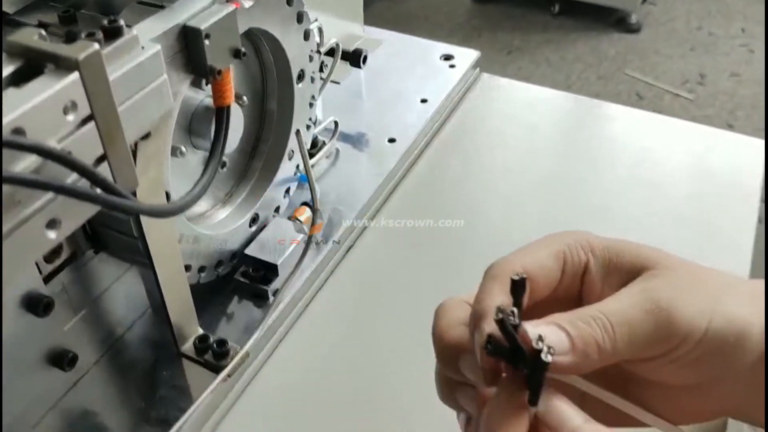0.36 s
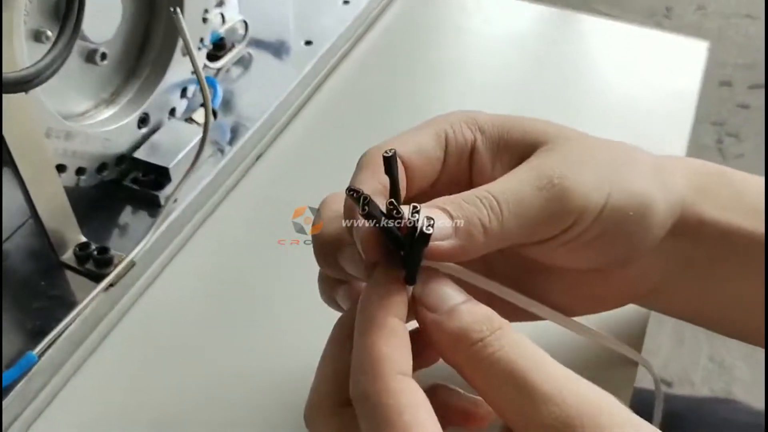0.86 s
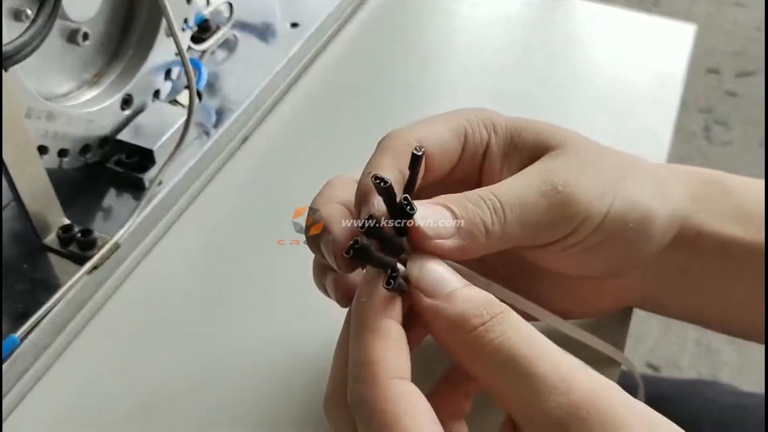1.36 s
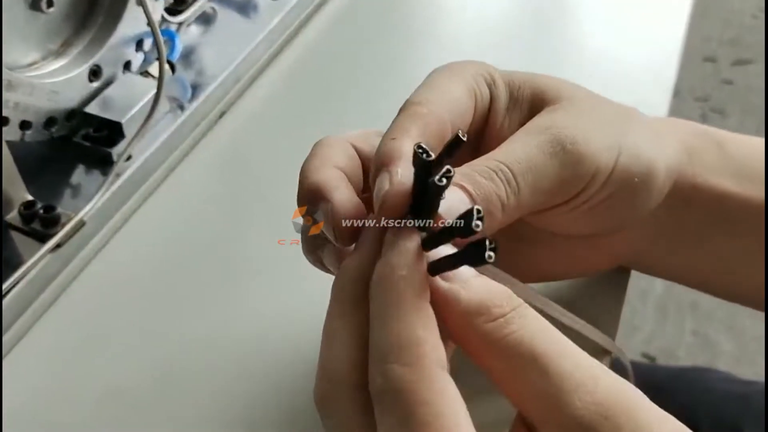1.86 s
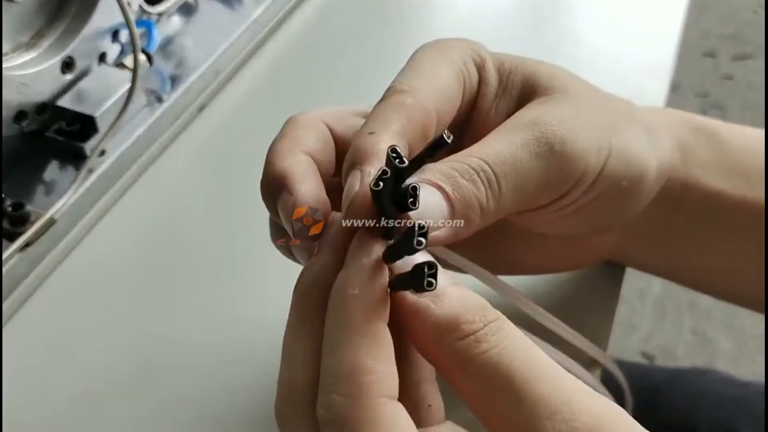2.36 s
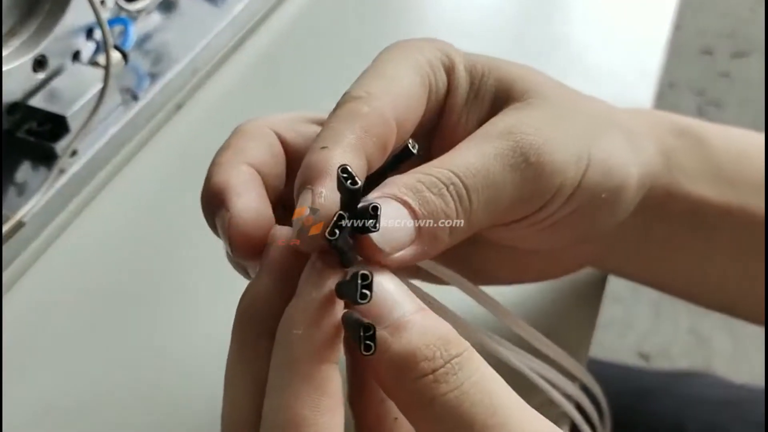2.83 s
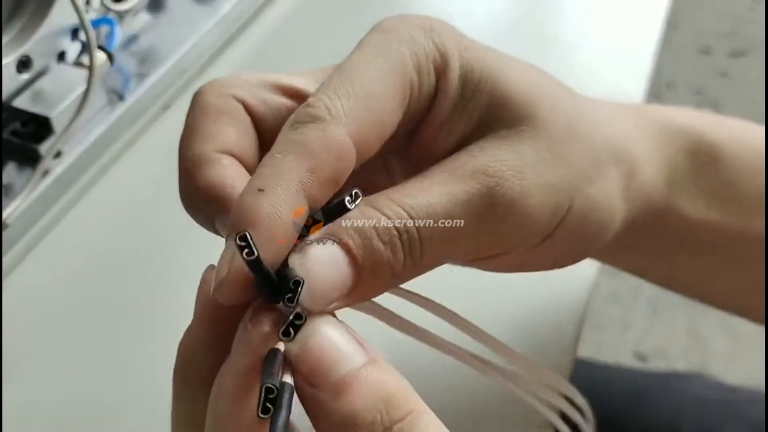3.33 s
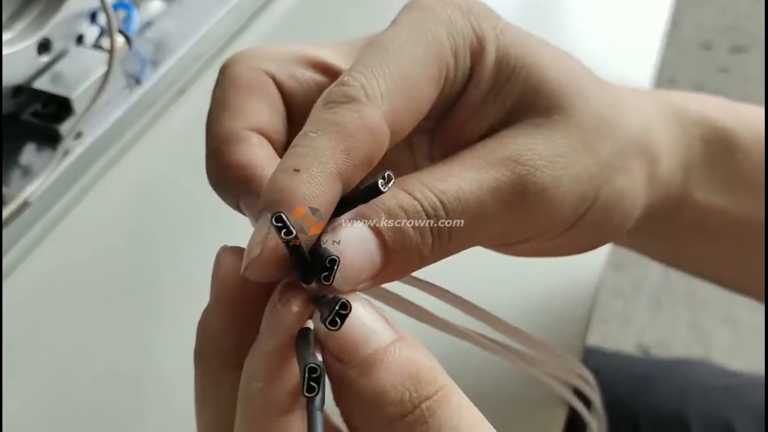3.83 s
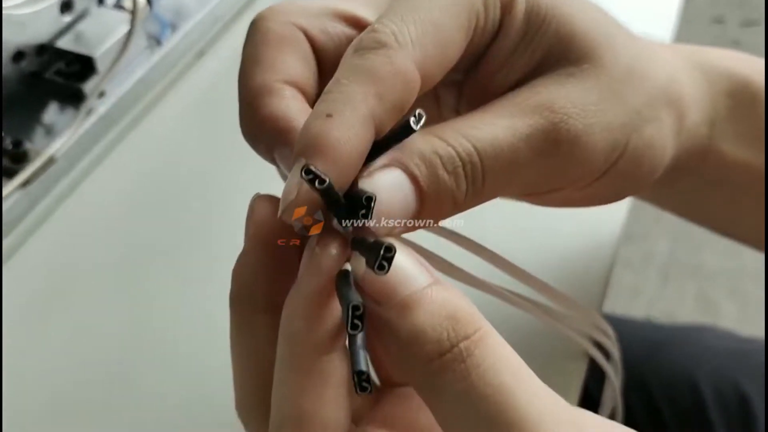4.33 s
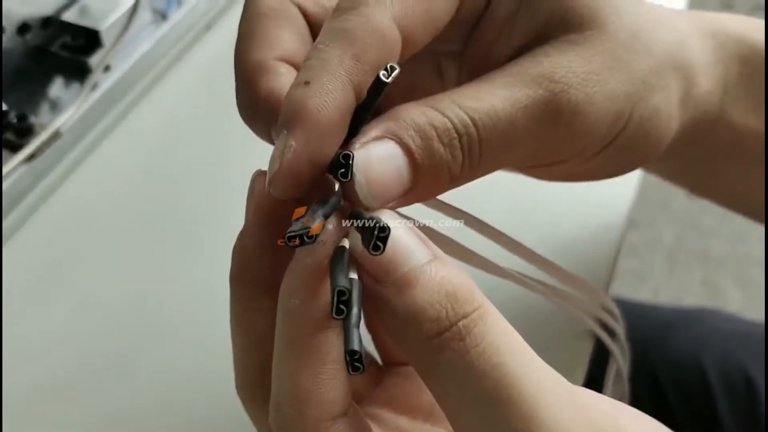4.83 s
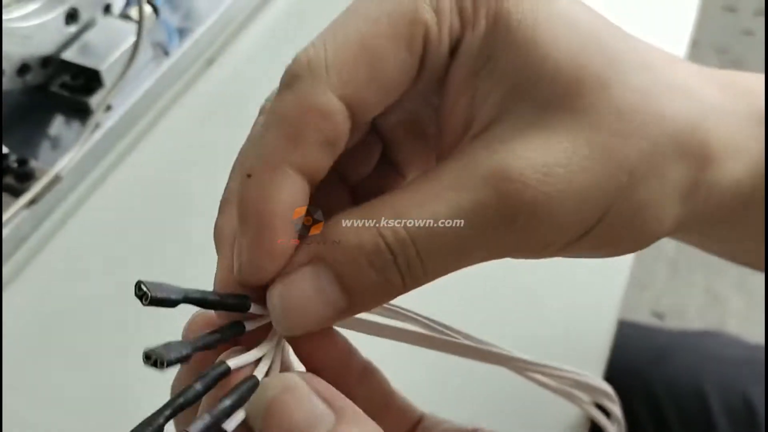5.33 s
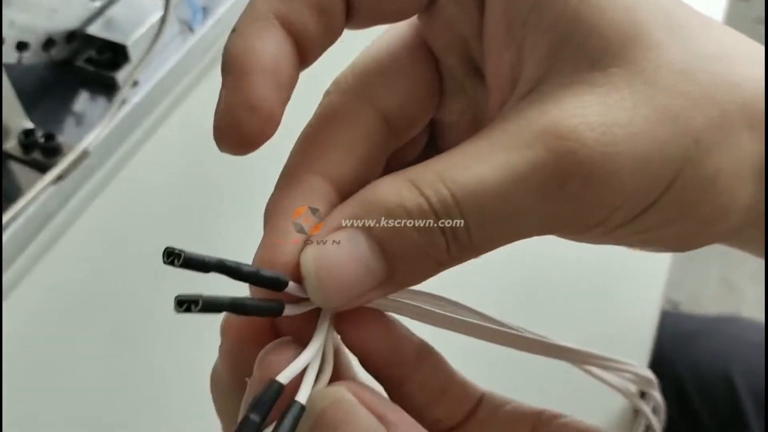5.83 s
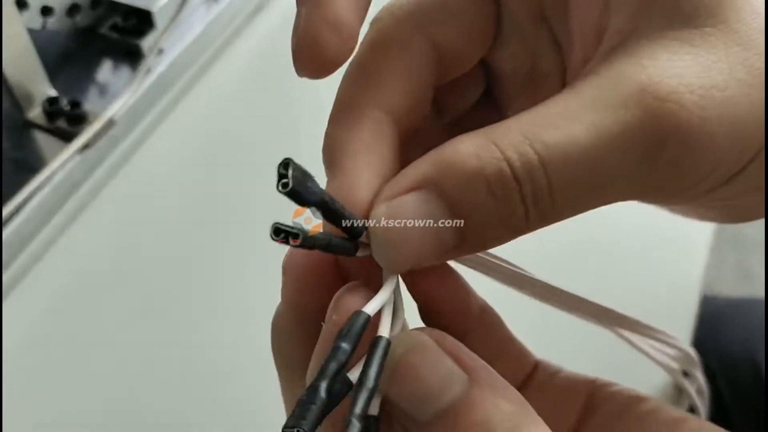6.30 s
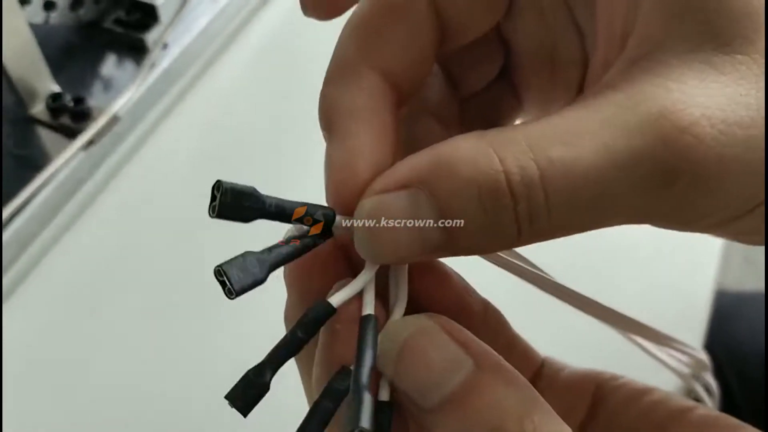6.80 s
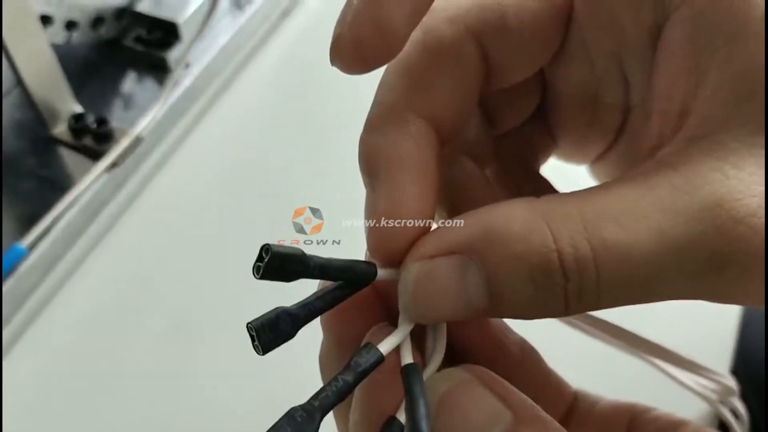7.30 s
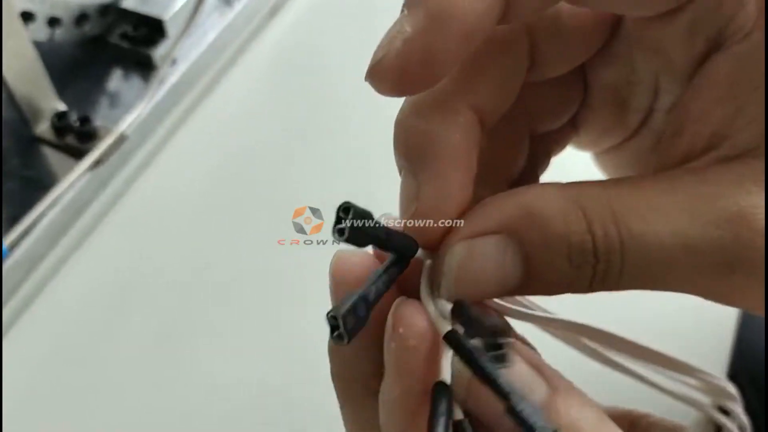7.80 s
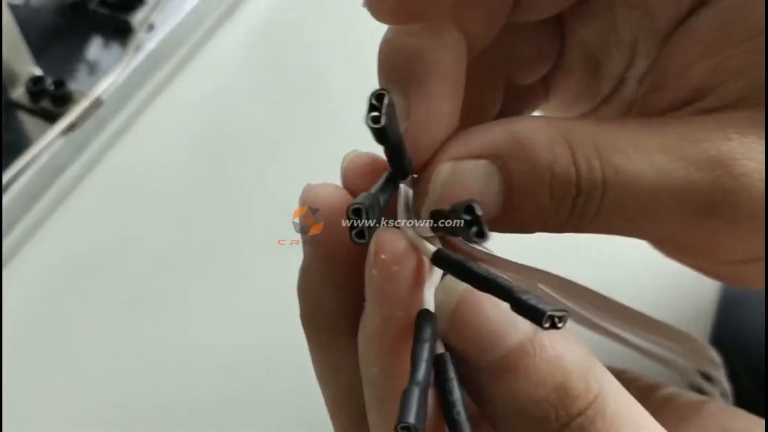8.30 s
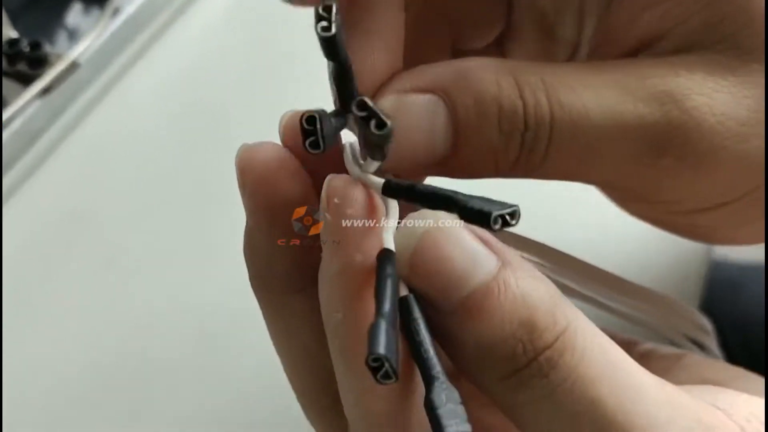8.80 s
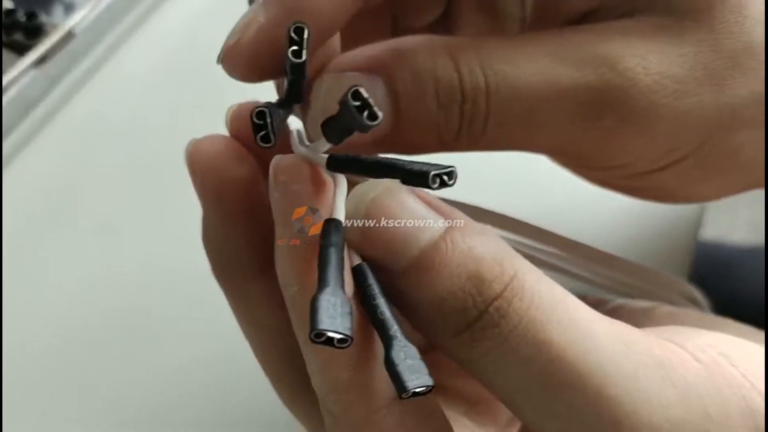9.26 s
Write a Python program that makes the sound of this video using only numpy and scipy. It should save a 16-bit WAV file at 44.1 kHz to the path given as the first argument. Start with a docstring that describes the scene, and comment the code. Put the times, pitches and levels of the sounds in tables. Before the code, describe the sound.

In a workshop, compressed air escapes from machine fittings as a strong, continuous high hiss. Below it lie a dull broadband rumble and a faint, wavering motor hum. A hand-held camera with two microphones turns from the machine to a bench, so the hiss changes colour slightly at first, then stays even. Small muffled air thumps touch one side at a time. Hands handling sleeved wire terminals make no distinct sound.

```python
"""A humming workshop: compressed air leaks from the fittings of a pneumatic machine with a steady high hiss.
Hiss and low rumble are shaped noise, partly alike at the two microphone ports of a hand-held camera near
the bench. The camera turns from machine to bench and sways, so the bench's reflections drift slowly across
the spectrum. Small puffs of air thump one port at a time; the machine hum is a set of wavering sines."""
import sys
import numpy as np
from scipy import signal
from scipy.fft import rfft, irfft, next_fast_len
from scipy.io import wavfile
from scipy.ndimage import uniform_filter1d, map_coordinates

SR = 44100
rng = np.random.default_rng(int(sys.argv[2]) if len(sys.argv) > 2 else 0)


def generate_wav(sig):
    """Save sig (samples, or channels by samples) to the path in sys.argv[1] as 16-bit PCM at SR."""
    pcm = np.round(np.clip(np.atleast_2d(sig).T, -1, 1) * 32767).astype(np.int16)
    wavfile.write(sys.argv[1], SR, pcm)


def how_loud(loudness_db):
    """Turn decibels into a plain amplitude multiplier (0 dB gives 1, 20 dB gives 10)."""
    steps = np.asarray(loudness_db, float) / 20
    return 10 ** steps


N = 425565  # length [samples]
FRAME = 2048  # short-time spectrum [samples]


def unit(x):
    """Scaled to rms 1."""
    return x / np.sqrt(np.mean(x ** 2) + 1e-20)


def along(points, hz):
    """Reads (frequency [Hz], value) points on a log frequency axis."""
    f, v = np.transpose(points)
    return np.interp(np.log(hz + 1), np.log(f + 1), v)


def closed(points, hz, low_db, high_db):
    """Gain of a spectrum that falls by low_db and high_db an octave beyond its ends."""
    octaves_below = np.log2(points[0][0] / (hz + 1)).clip(0)
    octaves_above = np.log2((hz + 1) / points[-1][0]).clip(0)
    return how_loud(along(points, hz) - low_db * octaves_below - high_db * octaves_above)


def bumps(rows, hz):
    """Bell-shaped lifts and hollows in dB, one row of the result for each port."""
    out = np.zeros((2, *hz.shape))
    for port, centre_hz, width_hz, db in rows:
        out[int(port > .5)] += db * np.exp(-.5 * ((hz - centre_hz) / width_hz) ** 2)
    return out


def patches(shape, bins, frames):
    """A random field of rms 1, smoothed over so many frequency bins and frames."""
    field = rng.standard_normal(shape)
    for _ in range(2):
        field = uniform_filter1d(field, max(1, round(bins)), axis=1)
        field = uniform_filter1d(field, max(1, round(frames)), axis=2)
    return unit(field)


def wobble(rate):
    """A smooth random curve with rate knots a second, 12 at most."""
    knots = rng.standard_normal(int(N * 12 / SR) + 4)
    return map_coordinates(knots, [np.arange(N) * min(rate, 12) / SR])


def air():
    """Jet hiss and workshop rumble reach both ports partly alike, coloured by the camera's pose."""
    noise = rng.standard_normal((2, N)) * np.sqrt(SR / 2)  # power 1 per Hz
    hz, t, z = signal.stft(noise, SR, nperseg=FRAME, noverlap=FRAME * 3 // 4)
    facing, paths, level_sway_db = camera_pose(t)
    # shorter path differences stretch the whole interference pattern up in frequency
    stretched = np.outer(hz, paths)
    pair = port_pair(z, hz, stretched)
    colour_db = pose_colour_db(hz, stretched, facing) + level_sway_db[:, None]
    eddies_db = 0.61 * patches(z.shape, bins=26, frames=8)
    power_sum = np.hypot(workshop_rumble(hz), air_jet(hz))[:, :, None]
    sound = pair * power_sum * near_reflections(hz, z.shape) * how_loud(colour_db + eddies_db)
    return signal.istft(sound, SR, nperseg=FRAME, noverlap=FRAME * 3 // 4)[1][:, :N]


def air_jet(hz):
    """The leak's turbulent hiss at each port, lifted and cut by cavity resonances in front of the ports."""
    # hiss density at each port before the pose colours it: (frequency [Hz], level [dB per Hz])
    jet_left = [(1900, -80), (2300, -70.5), (2900, -68.5), (3650, -72), (4500, -69), (5900, -67.5),
                (6450, -66.5), (7000, -72), (8150, -62.5), (9300, -70), (10600, -77), (11050, -79),
                (12100, -86), (13000, -100), (13900, -103), (15300, -103)]
    jet_right = [(2200, -72), (2900, -68.5), (3800, -69.5), (4250, -67.5), (5000, -66), (5700, -63.5),
                 (6050, -63.5), (7850, -65), (8500, -59.5), (9300, -62.5), (10200, -74), (10700, -72.5),
                 (11050, -78.5), (11500, -82), (12000, -76.5), (13600, -70), (15300, -69.5)]
    # cavity resonances: (port [0 left, 1 right], centre [Hz], width [Hz], lift [dB])
    cavity = [(0, 6500, 90, -1), (0, 6600, 120, 7.5), (0, 7650, 150, 7.5), (1, 1550, 80, -6),
              (1, 6450, 400, 3.5), (1, 7085, 220, 8.5), (1, 7527, 150, 7.5), (1, 7800, 90, -5)]
    jet = np.array([closed(points, hz, low_db=27, high_db=0) for points in (jet_left, jet_right)])
    return jet * how_loud(bumps(cavity, hz))


def camera_pose(t):
    """Turning to the machine shortens path differences; the unsteady hand sways path lengths and levels."""
    # the camera turns from the machine to the bench: (time [s], facing the machine [0-1])
    facing_points = [(0, 1), (.45, 0.74), (.75, 0.38), (2, 0.13), (4, 0.02), (9.65, 0.07)]
    shortening, path_law = 0.11, 0.78  # share of the path differences lost when facing, power of the facing
    sways_per_s, path_sway, sway_db = 0.94, 0.01, 0.19  # knots a second, share of path length, dB at each port
    at = np.minimum(t * SR, N - 1).astype(int)
    sway_path, *sway_level = [wobble(sways_per_s)[at] for _ in range(3)]
    facing = np.clip(np.interp(t, *np.transpose(facing_points)), 0, 1)
    paths = 1 - shortening * facing ** path_law + path_sway * sway_path
    return facing, paths, sway_db * np.array(sway_level)


def port_pair(z, hz, stretched):
    """Two noises mix into a partly alike pair; delay and reflections turn the left port's phase."""
    # how much of the sound both ports share: (frequency [Hz], likeness [0-1])
    likeness = [(60, 0.5), (150, 0.69), (400, 0.85), (600, 0.16), (870, 0.8), (1250, 0.54), (1450, 0.71),
                (1750, 0.31), (2200, 0.13), (2830, 0.95), (3300, 0.47), (4200, 0.38), (6300, 0.38),
                (9000, 0.3), (12500, 0.2)]
    # phase that reflections add at the left port: (frequency [Hz], phase [rad])
    reflected = [(0, .5), (700, 0.2), (870, 1.3), (1750, 1.6), (1900, -0.5), (2600, .5), (2960, -4.5),
                 (3400, -3), (3700, -5), (4100, -9), (5200, -6.5)]
    left_late_s = 0.000404  # at full path length
    drift_rad_per_khz = 0.19  # rms; short waves feel every small move
    drift = drift_rad_per_khz * hz[:, None] / 1000 * patches(z[:1].shape, bins=16.4, frames=124)[0]
    phase = np.interp(stretched, *np.transpose(reflected)) - 2 * np.pi * left_late_s * stretched + drift
    alike = np.clip(along(likeness, stretched), 0, 1)
    left = alike * np.exp(1j * phase) * z[1] + np.sqrt(1 - alike ** 2) * z[0]
    return np.array([left, z[1]])


def pose_colour_db(hz, stretched, facing):
    """Colour that holds while the camera faces the machine, and bench reflections that follow the paths."""
    # colour when fully facing the machine: (port [0 left, 1 right], centre [Hz], width [Hz], lift [dB])
    facing_colour = [(0, 1490, 300, -7.5), (0, 5500, 250, 4), (0, 6800, 500, -6), (0, 8440, 400, -2),
                     (0, 9400, 200, 0), (0, 11000, 700, 3), (1, 1400, 250, -2.5), (1, 4870, 800, -3),
                     (1, 7620, 200, 5), (1, 8300, 200, -0.5), (1, 9030, 150, 6.5), (1, 13300, 600, -6)]
    # where the bench's reflection meets the direct hiss, mostly cancelling it:
    # (port [0 left, 1 right], centre at full path length [Hz], width [Hz], lift [dB])
    hollows = [(0, 1720, 50, -4.5), (0, 3630, 70, -5), (1, 1390, 50, -1), (1, 2800, 50, 2),
               (1, 3650, 70, -4.5)]
    return bumps(facing_colour, hz)[:, :, None] * facing + bumps(hollows, stretched)


def near_reflections(hz, shape):
    """Reflections add to the direct sound at random phase: narrow ridges and hollows that drift."""
    share = 0.34 * np.clip(hz / 5000, .45, 1)[:, None]
    in_phase = patches(shape, bins=4, frames=74)
    quadrature = patches(shape, bins=4, frames=53)
    echoes = share * (in_phase + 1j * quadrature)
    return (1 + echoes) / np.sqrt(1 + 2 * share ** 2)  # mean power kept


def puffs():
    """Each eddy pushes one membrane: a short thump, a short low flutter, then a weaker eddy in its wake."""
    # puffs of air on one port: (time [s], port [0 left, 1 right], level before bass roll-off [dB], centre [Hz])
    puff_table = [(0.516, 0, -31.5, 210), (1.42, 1, -30.5, 170), (4.877, 1, -29.5, 170),
                  (5.014, 1, -37, 170), (5.642, 1, -32, 140), (5.68, 1, -34, 170), (5.731, 1, -27.5, 199),
                  (6.0, 1, -37, 150), (6.084, 1, -37, 170), (8.703, 0, -37, 160), (8.949, 1, -29.5, 160),
                  (8.98, 1, -30, 200), (9.021, 1, -34, 160), (9.08, 1, -35, 200)]
    flutter_db, flutter_s, flutter_late_s = -15, 0.034, 0.012  # level against the thump, bell width, delay
    wake_s, wake_db = 0.16, -14  # mean delay before a 1 s cap, level against the puff
    out, t = np.zeros((2, N + 2 * SR)), np.arange(-SR // 4, SR // 4) / SR
    low = signal.butter(2, [90, 280], "bandpass", fs=SR, output="sos")
    wakes = [(s + min(rng.exponential(wake_s), 1), port, db + wake_db, hz) for s, port, db, hz in puff_table]
    for s, port, db, hz in puff_table + wakes:
        thump = np.exp(-.5 * (t * hz * 2.3) ** 2) * np.sin(2 * np.pi * (hz * t + rng.random()))
        swell = np.exp(-.5 * ((t - flutter_late_s) / flutter_s) ** 2)
        flutter = swell * unit(signal.sosfilt(low, rng.standard_normal(len(t))))
        out[int(port > .5), round(s * SR):][:len(t)] += how_loud(db) * (thump + how_loud(flutter_db) * flutter)
    low_cut = signal.butter(2, 60, "highpass", fs=SR, output="sos")  # the microphones' own bass roll-off
    return signal.sosfiltfilt(low_cut, out)[:, SR // 4:][:, :N]


def hum():
    """Steady machine tones whose level wavers with the standing waves of the room."""
    # motor and transformer hum: (frequency [Hz], left level [dB], right level [dB], waver [dB])
    hum_tones = [(132.6, -70, -66.5, 2), (173, -76, -70, 2.5), (400, -63, -64.5, -3.5),
                 (512.6, -65, -62, 3), (595, -82, -64.5, 0), (613, -66.5, -67, 1.5), (704, -77, -65.5, 2),
                 (808, -71, -67, 1)]
    out, t = np.zeros((2, N)), np.arange(N) / SR
    for hz, left_db, right_db, waver_db in hum_tones:
        cycles = hz * t + 0.11 * wobble(4) + rng.random()
        tone = np.sqrt(2) * np.sin(2 * np.pi * cycles)
        out += how_loud([[left_db], [right_db]]) * how_loud(waver_db * wobble(0.81)) * tone
    return out


def workshop_rumble(hz):
    """Low broadband rumble of the workshop as it stands at each port."""
    # rumble density at each port before the pose colours it: (frequency [Hz], level [dB per Hz])
    shop_left = [(40, -100), (70, -95), (130, -80), (250, -79.5), (340, -78), (420, -76.5), (560, -78),
                 (700, -82), (860, -75.5), (1100, -75), (1300, -71), (1500, -70.5), (1750, -70),
                 (2000, -73)]
    shop_right = [(40, -101), (70, -87), (130, -82), (250, -77), (330, -80.5), (420, -75), (480, -79),
                  (650, -78.5), (850, -71.5), (1000, -82), (1200, -73), (1450, -77.5), (1700, -75.5),
                  (2000, -72.5)]
    return np.array([closed(points, hz, low_db=12, high_db=38) for points in (shop_left, shop_right)])


def scene():
    """Everything that reaches the two ports."""
    return air() + puffs() + hum()


def roll_off(x):
    """The treble ends steeply here."""
    return signal.sosfilt(signal.butter(12, 16830, fs=SR, output="sos"), x)


def record(dry):
    """The camera keeps nothing above its band limit."""
    top_hz = 15500
    size = next_fast_len(N)
    spectrum = rfft(dry, size)
    spectrum[:, np.fft.rfftfreq(size, 1 / SR) > top_hz] = 0
    mix = irfft(spectrum, size)[:, :N]
    return roll_off(mix)


dry = scene()
out = record(dry)
generate_wav(out)
```